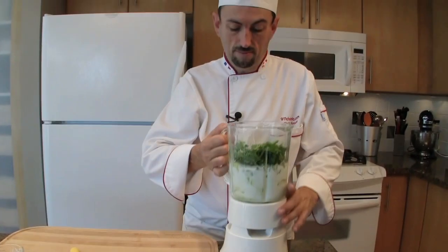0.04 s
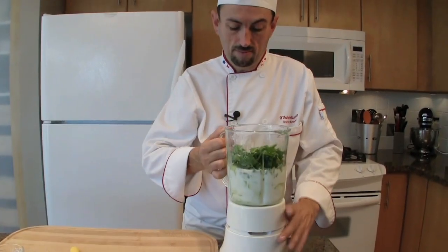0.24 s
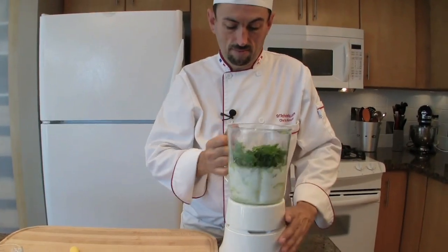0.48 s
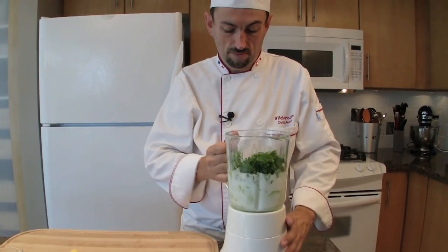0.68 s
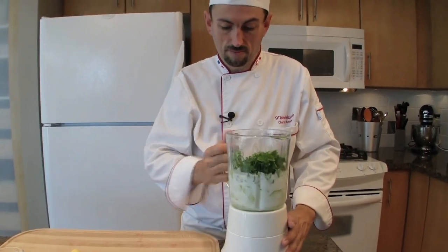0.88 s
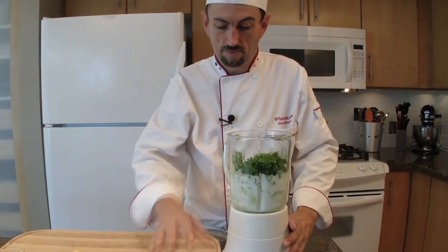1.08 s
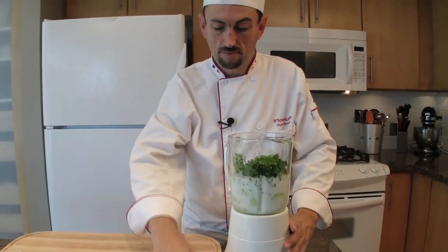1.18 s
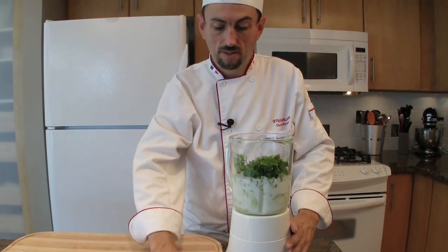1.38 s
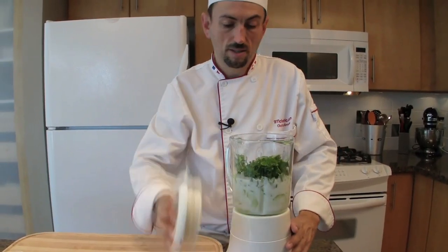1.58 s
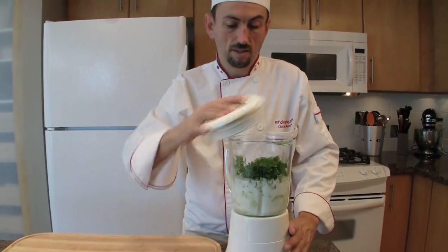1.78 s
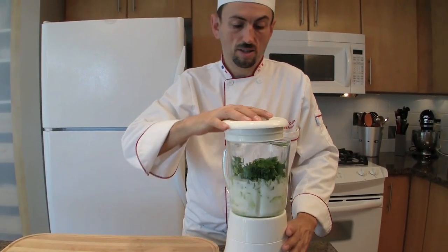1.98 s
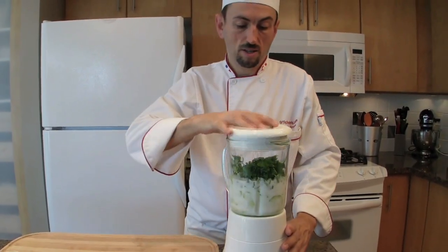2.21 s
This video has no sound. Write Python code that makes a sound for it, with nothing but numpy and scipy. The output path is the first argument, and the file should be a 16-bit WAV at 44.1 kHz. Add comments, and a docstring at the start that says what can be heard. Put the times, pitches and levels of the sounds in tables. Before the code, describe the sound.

A blender jar clinks lightly on its plastic base at about 0.15 seconds, then clacks and judders until 0.5. At 0.7 it drops home with a loud, hollow thud and a short rattle. Faint ticks and sleeve rustle come between 1 and 1.8 seconds, and the lid is patted on at 2.1. The close knocks echo briefly in a small kitchen over a faint appliance hum.

```python
"""In a small kitchen, a filled blender jar is twisted onto its plastic base, close to the microphone.
The jar clinks on the drive coupling, clacks and judders over the lugs (the tabs that lock it),
then drops home with a thud that booms in the hollow base, shakes the counter and rattles loose parts.
The lid is picked up with a few ticks and a sleeve rustle, and patted on.
The knocks echo briefly off cupboards and tiles while an appliance hums."""
import sys
import numpy as np
from scipy import signal
from scipy.fft import rfft, irfft, next_fast_len
from scipy.io import wavfile
from scipy.ndimage import uniform_filter1d, map_coordinates

SR = 44100
rng = np.random.default_rng(int(sys.argv[2]) if len(sys.argv) > 2 else 0)


def store_wav(level_fs):
    """Save 16-bit WAV to argv[1]."""
    pcm = np.round(np.clip(np.atleast_2d(level_fs), -1, 1) * 32767)
    wavfile.write(sys.argv[1], SR, pcm.T.astype(np.int16))


N = 99225


# The jar landing on the base: t/s, level/dB, f/Hz, t60/s (t60 is the time to fade by 60 dB)
THUDS = [(.021, -23, 435, 0.015), (.031, -25.5, 361, 0.043), (0.2308, -5, 344, 0.052),
         (0.2528, -10.5, 390, 0.041), (.306, -22, 422, 0.068), (0.3857, -10.5, 355, 0.032),
         (.398, -11, 429, 0.046), (.423, -18, 423.5, 0.068), (.441, -15.5, 421, 0.073),
         (0.463, -15.5, 336, .05), (.488, -11, 418.4, 0.066), (0.5127, -11, 455.5, 0.084),
         (.676, -14, 350, 0.052), (.697, 0, 362.5, 0.094), (0.7282, 0, 389, 0.047), (.746, -10, 437, 0.081),
         (0.775, -11, 356, 0.042), (.811, -18, 380.2, .12), (.848, -24, 363, 0.072)]
def base_thuds(rise_s=0.001, upper_db=-11.5, upper_ratio=1.42):
    """The hollow base booms with two tones each time the jar's weight lands on it."""
    out = np.zeros(N)
    attack = 1 - np.exp(-seconds(SR // 2) / rise_s)
    for start, db, hz, t60 in THUDS:
        boom = mode(hz, t60) + amp(upper_db) * mode(hz * upper_ratio, t60)
        add(out, start, amp(db) * attack * boom)
    return out


# The tones of the struck jar: f/Hz, level/dB, t60/s
JAR_MODES = [(540, -14.5, 0.042), (871, 1, 0.047), (1055, -3.5, 0.074), (1240, 1, 0.038), (1679, 0.5, .045),
             (1915, -8, 0.054), (2710, -14.5, 0.053), (3730, -15, 0.05), (5340, -18.5, 0.013)]
# Knocks on the lugs: t/s, ring level/dB, crack level/dB, crack tilt/(dB per octave), pitch ratio
CLACKS = [(.2305, -23.5, -29.5, 0, 1.0), (0.2534, -20.5, -29.5, -4, .97), (0.259, -28, -27.5, -2.5, 1.0),
          (.306, -22, -40, -4, .98), (.315, -30, -38, 1.5, 1.0), (0.3384, -11, -20.5, 0, .96),
          (0.3856, -13.5, -21, -2.5, .92), (.395, -23, -14.5, 1, .92), (.399, -11.5, -43, -5, .9),
          (0.408, -13, -49.5, -2.5, .92), (.422, -11.5, -21, 2, .9), (0.429, -12.5, -13.5, -4.5, .9),
          (0.44, -25.5, -22, -6, .9), (.462, -14, -29.5, -1, .92), (0.487, -17.5, -44, 0.5, .9),
          (0.5121, -15.5, -16.5, 2.5, .92), (.519, -21.5, -17.5, -1, .9), (0.674, -20.5, -48.5, -3, .92),
          (.692, -22, -25.5, 4, 1.0), (.697, -6.5, -20, 3.5, 1.02), (.701, -11.5, -7.5, -4.5, 1.0),
          (.71, -13.5, -12, -6, 1.08), (.731, -18, -12.5, -3, 1.0)]
def jar_clacks():
    """The jar's foot strikes the lugs: each knock is a sharp crack plus the jar's own ring."""
    out = np.zeros(N)
    for start, ring_db, crack_db, tilt, pitch in CLACKS:
        add(out, start, amp(ring_db) * ring(JAR_MODES, pitch) + amp(crack_db) * crack(tilt))
    return out


# Moments when the jar catches: t/s, length/s, f/Hz, level/dB, upper tone level/dB
JUDDERS = [(0.339, 0.021, 846, -21, -18.5), (.516, 0.021, 798, -16.5, -27)]
def jar_judders(upper_ratio=1.89, roughness=0.44, grit_db=-37, rise_s=0.0046):
    """The jar sticks and slips on the plastic: a rough squeak with a puff of grit at each slip."""
    out, t = np.zeros(N), seconds()
    for start, length, hz, db, upper_db in JUDDERS:
        phase = 2 * np.pi * hz * t + roughness * wobble(300)
        squeak = amp(db) * np.sin(phase) + amp(upper_db) * np.sin(upper_ratio * phase)
        slips = np.maximum(np.sin(phase), 0) ** 2
        grit = amp(grit_db) * noise(CRACK_SPECTRUM) * slips
        envelope = np.minimum(t / rise_s, 1) * fade(t - length, t60=0.039)
        add(out, start, envelope * (squeak + grit))
    return out


HOME_S = 0.69  # when the jar drops home
def loose_rattle(count=20, spread_s=0.14):
    """Loose parts rattle after the drop: many small, dull knocks that die away."""
    out = np.zeros(N)
    for delay in spread_s * (np.arange(count) + 2 + rng.random(count)) / count:
        strength = amp(-28.5 + 2 * rng.normal()) * fade(delay, t60=0.78)
        add(out, HOME_S + delay, strength * crack(tilt=-1.5))
    return out


# The tones of the jar ringing freely, before the base damps it: f/Hz, level/dB, t60/s
FREE_JAR_MODES = [(470, -11, 0.061), (894, -3, 0.054), (1219, -8.5, 0.075), (1697, -0.5, 0.052),
                  (2700, -21, 0.027), (3640, -13.5, 0.047), (4860, -8.5, 0.011), (5360, -9, 0.011),
                  (6500, -17.5, .015)]
# The jar first touching the drive coupling: t/s, ring level/dB, crack level/dB
CLINKS = [(0.1398, -14, -26), (.189, -26.5, -32)]
def jar_clinks():
    """The jar gives two light, clear clinks as it first touches the drive coupling, ringing freely before the
    base damps it."""
    out = np.zeros(N)
    for start, ring_db, crack_db in CLINKS:
        ringing = amp(ring_db) * ring(FREE_JAR_MODES, pitch=1, detune=0)
        add(out, start, ringing + amp(crack_db) * crack(tilt=2.5))
    return out


# Low shakes under the jar: t/s, rise/s, f/Hz, level/dB, t60/s
SHUDDERS = [(0.189, 0.029, 131, -31, 0.51), (.3, .04, 55.5, -36, 0.41), (0.692, .005, 135.6, -24, 0.11),
            (.697, 0.0061, 266.8, -28, 0.54), (.7, 0.083, 44.4, -31.5, 0.42), (.71, 0.029, 65, -36.5, .35)]
def counter_shudders():
    """The counter and the base's housing shake with deep tones that swell and fade."""
    out, t = np.zeros(N), seconds()
    for start, rise, hz, db, t60 in SHUDDERS:
        envelope = np.minimum(t / rise, 1) * fade(t - rise, t60)
        add(out, start, amp(db) * envelope * np.sin(2 * np.pi * hz * t))
    return out


# Small things touched on the way to the lid: t/s, crack level/dB, f/Hz, ring level/dB, t60/s
TICKS = [(1.027, -37.5, 1650, -38.5, 0.027), (1.066, -38.5, 1046, -39, 0.32), (1.069, -50, 1147, -41, 0.17),
         (1.604, -38.5, 1180, -44, .03), (1.762, -55, 762, -31, 0.031)]
# The tones of the lid: f/Hz, level/dB, t60/s
LID_MODES = [(350, -11.5, 0.14), (508, 1, 0.057), (640, -6.5, 0.042), (863, -17.5, 0.099),
             (1138, -17, 0.18), (1460, -16, 0.079), (2020, -14, 0.013)]
# Pats on the lid: t/s, ring level/dB, crack level/dB, pitch ratio
PATS = [(2.0866, -22, -38.5, 1.04), (2.107, -21.5, -30, 1.0)]
def lid_taps():
    """The lid is fetched with a few ticks, then lands on the rim one edge after the other."""
    out = np.zeros(N)
    for start, crack_db, hz, ring_db, t60 in TICKS:
        add(out, start, amp(crack_db) * crack() + amp(ring_db) * mode(hz, t60))
    for start, ring_db, crack_db, pitch in PATS:
        add(out, start, amp(ring_db) * ring(LID_MODES, pitch) + amp(crack_db) * crack(tilt=-4))
    return out


# Sharp little snaps: t/s, level/dB, f/Hz
SNAPS = [(1.486, -39, 4650), (1.739, -42, 5500), (1.762, -43, 4740), (1.792, -40, 5500)]
def lid_snaps(width_octaves=0.19):
    """The lid snaps in the fingers: a tiny burst of noise around one pitch, plus a fainter crack."""
    out, t = np.zeros(N), seconds(SR // 16)
    for start, db, hz in SNAPS:
        white = rng.standard_normal(len(t))
        band = filtered(white, lambda f: bell_curve(np.log2((f + 1) / hz), width_octaves))
        snap = band * fade(t, t60=0.0067) * np.minimum(t / CONTACT_RISE_S, 1)
        add(out, start, amp(db) * snap / np.abs(snap).max())
        add(out, start, amp(db - 11) * crack(tilt=2))
    return out


# The tone colour of rubbed cloth: f/Hz, level/dB
CLOTH_SPECTRUM = [(100, -44), (300, 7.5), (800, -0.5), (1600, -5.5), (3200, -14), (5200, -22.5),
                  (7500, -34), (16000, -55)]
# How loud the rubbing is over time: t/s, level/dB
RUB_LEVELS = [(0, -56), (.12, -52.5), (.2, -43.5), (.32, -37), (.55, -40), (.65, -45.5), (1.0, -51),
              (1.1, -47.5), (1.2, -63), (1.42, -56), (1.52, -49.5), (1.62, -50.5), (1.7, -57),
              (1.84, -51.5), (2.0, -56.5), (2.25, -52)]
def sleeve_rustle(flutter_db=1.9):
    """Hands and cloth rub, making a soft noise that swells unevenly."""
    level_db = np.interp(seconds(), *np.transpose(RUB_LEVELS))
    return noise(CLOTH_SPECTRUM) * amp(level_db + flutter_db * wobble(59.64))


# The tone colour of the sliding jar: f/Hz, level/dB
SLIDE_SPECTRUM = [(300, -42), (4800, -25), (5700, 0), (6200, -11), (6800, -3), (7600, -26), (16000, -36)]
def jar_slide(peak_s=0.071, width_s=0.042):
    """A thin hiss comes and goes as the jar first slides."""
    return noise(SLIDE_SPECTRUM) * amp(-63) * bell_curve(seconds() - peak_s, width_s)


# How long the echo lasts: f/Hz, t60/s
ECHO_T60 = [(100, 0.41), (350, 0.43), (1000, 0.43), (3000, 0.54), (6000, 0.55), (12000, .2)]
# The tone colour of the echo: f/Hz, level/dB
ECHO_SPECTRUM = [(80, 13), (350, -11.5), (800, -9.5), (2000, -8), (5000, -6), (8000, -18), (14000, -9)]
def kitchen_echo(x, paths=4, build_s=0.02):
    """Echoes from cupboards and tiles build up and die away; blows take different paths in turn."""
    out = np.zeros(N)
    turn = (np.arange(N) // (SR // 40)) % paths  # the next path every 25 ms
    for path in range(paths):
        hz, t, noise_bands = signal.stft(rng.standard_normal(SR), SR, nperseg=256)
        envelope = fade(t, along(ECHO_T60, hz)[:, None]) * (1 - np.exp(-t / build_s))
        band_size = np.sqrt(SR * np.mean(envelope ** 2, axis=1, keepdims=True))
        envelope *= amp(along(ECHO_SPECTRUM, hz))[:, None] / band_size
        _, echo = signal.istft(noise_bands * envelope, SR, nperseg=256)
        share = 1.0 * (turn == path)
        smooth_share = uniform_filter1d(uniform_filter1d(share, size=200), size=200)
        out += signal.fftconvolve(x * smooth_share, echo)[:N]
    return out


def appliance_hum(hz=147.9, level_db=-50.5):
    """An appliance hums on one low note that wavers in loudness and pitch."""
    loudness = amp(3.1 * wobble(8.42))
    phase = 2 * np.pi * hz * seconds() + 0.95 * wobble(12.32)
    return amp(level_db) * unit(loudness * np.sin(phase))


# The tone colour of the quiet room: f/Hz, level/dB
AIR_SPECTRUM = [(12, -38), (20, -1), (44, -2), (96, -8), (134, -10.5), (158, -3), (204, -5.5), (410, -18),
                (1330, -23), (2670, -29.5), (6910, -43), (14700, -45), (16000, -46)]
def room_air(level_db=-47):
    """The room's air is a faint, steady, low rush."""
    return amp(level_db) * noise(AIR_SPECTRUM)


# The tone colour of two hard things meeting: f/Hz, level/dB
CRACK_SPECTRUM = [(300, -18.5), (1200, 7.5), (2500, 4), (4000, 0.5), (5500, -4), (6800, -10), (8000, -22.5),
                  (11000, -33), (16000, -45)]
CONTACT_RISE_S = 0.00033
def crack(tilt=0, pivot_hz=3000):
    """The short noise of a contact, peak 1; harder contacts tilt it towards the treble."""
    t = seconds(SR // 2)
    spectrum = [(hz, db + tilt * np.log2(hz / pivot_hz)) for hz, db in CRACK_SPECTRUM]
    burst = noise(spectrum, len(t)) * fade(t, t60=0.031) * np.minimum(t / CONTACT_RISE_S, 1)
    return burst / np.abs(burst).max()


def ring(modes, pitch, detune=0.023, scatter_db=1.5):
    """A struck object rings with several tones, mixed a little differently at each blow; peak 1."""
    tones = 0
    for k, (hz, db, t60) in enumerate(modes):
        gain = amp(db + scatter_db * rng.normal()) * (-1) ** k  # every other tone starts downwards
        tones += gain * mode(hz * pitch * (1 + detune * rng.normal()), t60)
    return tones / np.abs(tones).max()


def mode(hz, t60):
    """One fading tone of a struck object."""
    t = seconds(SR // 2)
    return np.sin(2 * np.pi * hz * t) * fade(t, t60)


def fade(t, t60):
    """Stays at 1 until t = 0, then falls by 60 dB every t60 seconds."""
    return np.exp(-np.log(1000) * np.maximum(t, 0) / t60)


def bell_curve(x, width):
    """A smooth bump, 1 high at x = 0."""
    return np.exp(-0.5 * (x / width) ** 2)


def noise(spectrum, size=N):
    """Noise with the given tone colour and an average size (rms) of 1."""
    return unit(filtered(rng.standard_normal(size), lambda hz: amp(along(spectrum, hz))))


def filtered(x, response):
    """Turn each frequency in x up or down by the gain response(hz)."""
    size = next_fast_len(len(x) + SR // 4)
    return irfft(rfft(x, size) * response(np.fft.rfftfreq(size, 1 / SR)), size)[:len(x)]


def wobble(rate):
    """A smooth curve through `rate` random values a second."""
    return map_coordinates(rng.standard_normal(4096), [seconds() * rate], mode="wrap")


def along(points, hz):
    """Read between the rows of a (frequency, value) table, with octaves evenly spaced."""
    freqs, values = np.transpose(points)
    return np.interp(np.log(hz + 1), np.log(freqs + 1), values)


def amp(db):
    """Decibels to gain."""
    return 10 ** (np.asarray(db) / 20)


def unit(x):
    """Scale to an average size (rms) of 1."""
    return x / np.sqrt(np.mean(x ** 2) + 1e-20)


def seconds(size=N):
    """The time of each sample."""
    return np.arange(size) / SR


def add(out, start, x):
    """Mix x into out, beginning at `start` seconds."""
    i = max(0, round(start * SR))
    out[i:i + len(x)] += x[:max(0, N - i)]


# The microphone's slight loss of treble: f/Hz, level/dB
MIC_RESPONSE = [(20, 0), (7000, 0), (9000, -1), (12000, -2), (16000, -3)]
def scene():
    """Every source is heard directly; the knocks also echo round the room."""
    thuds = base_thuds()
    jar = jar_clacks() + jar_judders() + loose_rattle()
    clinks, lid = jar_clinks(), lid_taps()
    # once home, the jar shakes the whole blender, which sounds further into the room
    home_boost = amp(4 * (seconds() > HOME_S))
    into_room = amp(-4.5) * thuds + amp(-3) * home_boost * jar + amp(-5.5) * clinks + amp(-3) * lid
    sound = thuds + jar + clinks + lid + kitchen_echo(into_room)
    sound += counter_shudders() + sleeve_rustle() + jar_slide() + lid_snaps()
    softened = filtered(sound, lambda hz: amp(along(MIC_RESPONSE, hz)))
    return (softened + appliance_hum() + room_air())[None]


PEAK_LIMIT, TOP_HZ = 0.66, 15850
def record(dry):
    """Round off the loudest peaks and cut the very highest treble."""
    rounded = dry[0] / (1 + np.abs(dry[0] / PEAK_LIMIT) ** 6) ** (1 / 6)
    return filtered(rounded, lambda hz: hz < TOP_HZ)[None]


dry = scene()
out = record(dry)
store_wav(out)
```